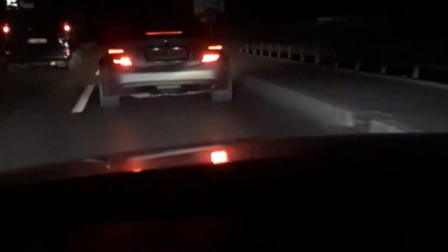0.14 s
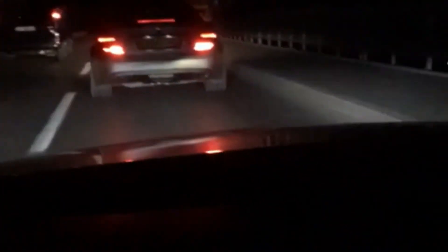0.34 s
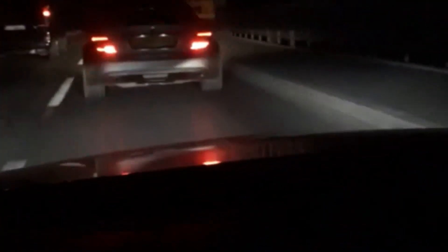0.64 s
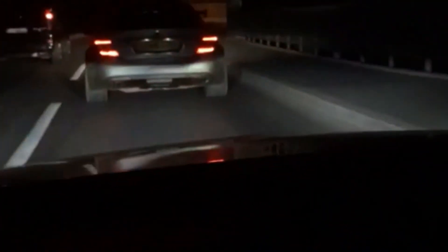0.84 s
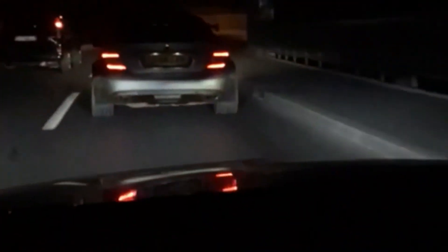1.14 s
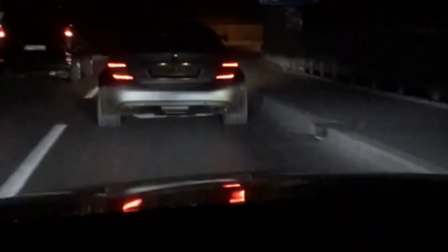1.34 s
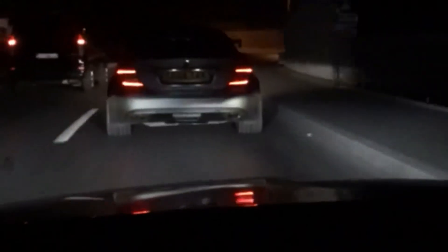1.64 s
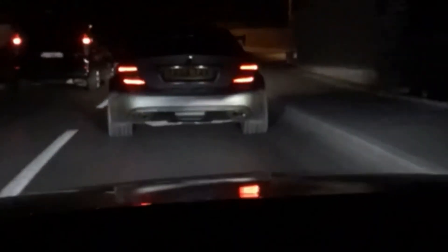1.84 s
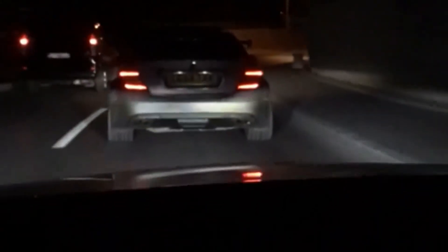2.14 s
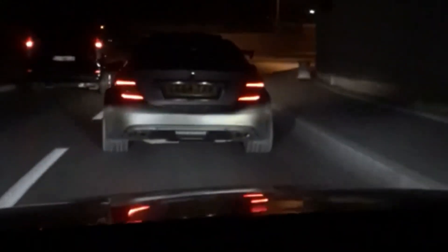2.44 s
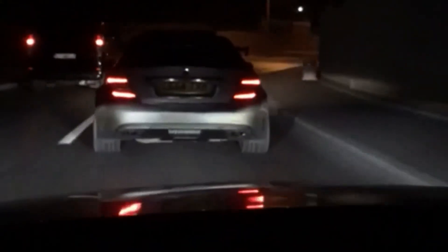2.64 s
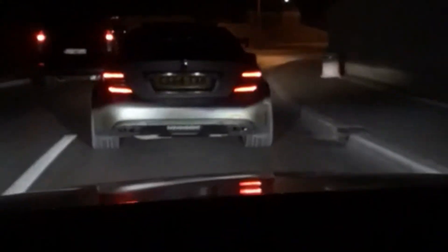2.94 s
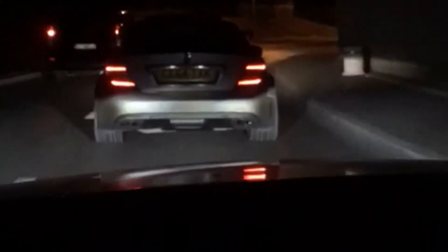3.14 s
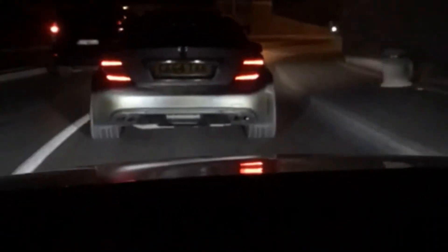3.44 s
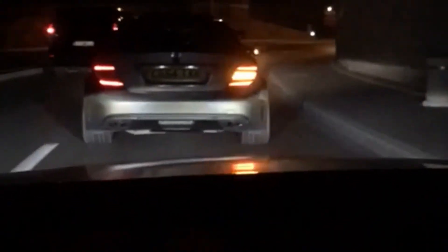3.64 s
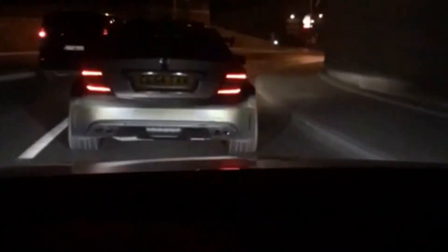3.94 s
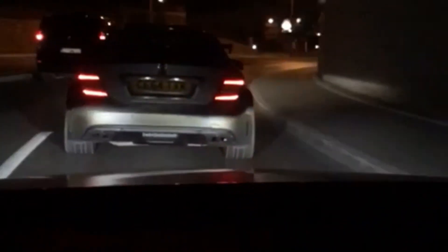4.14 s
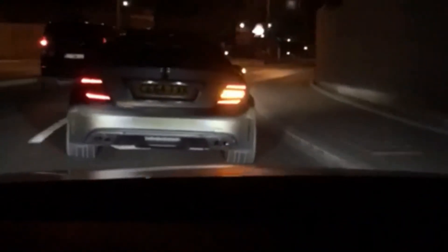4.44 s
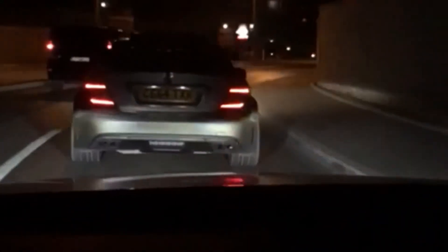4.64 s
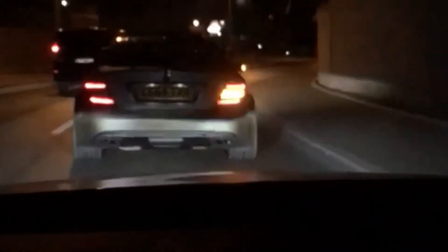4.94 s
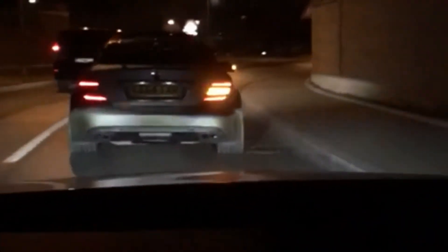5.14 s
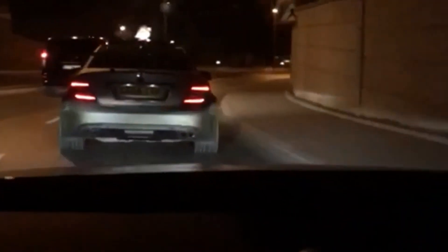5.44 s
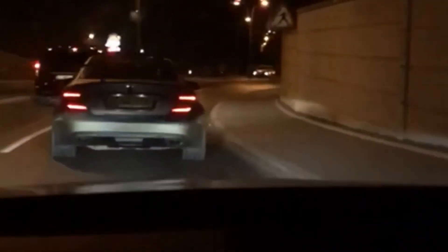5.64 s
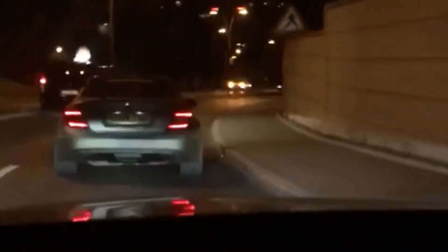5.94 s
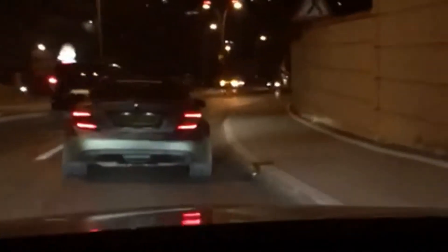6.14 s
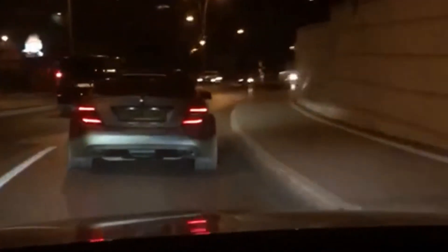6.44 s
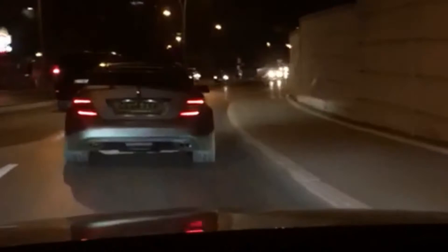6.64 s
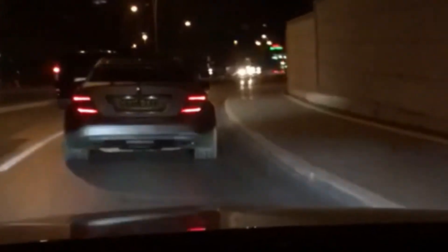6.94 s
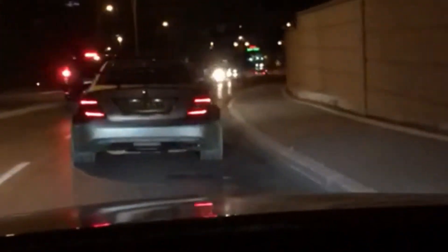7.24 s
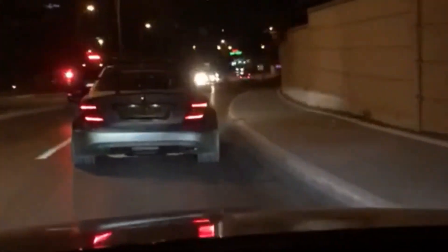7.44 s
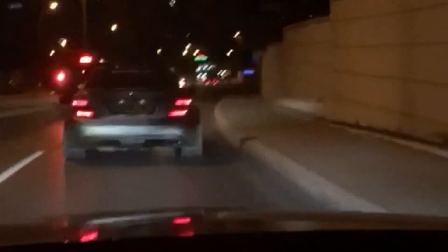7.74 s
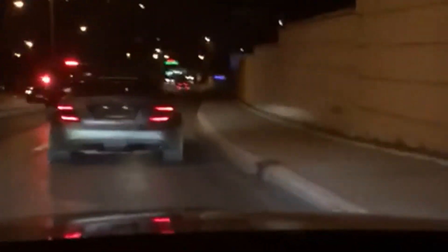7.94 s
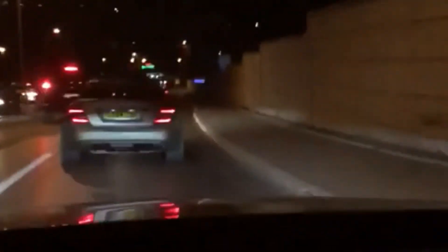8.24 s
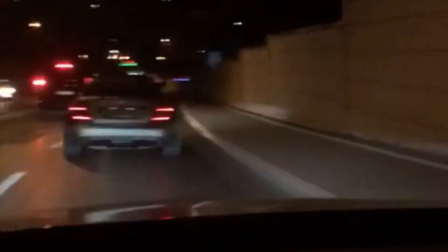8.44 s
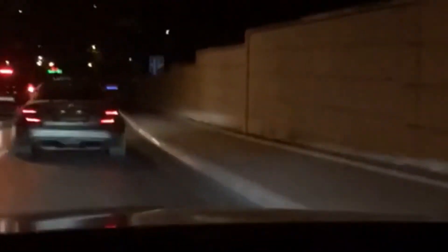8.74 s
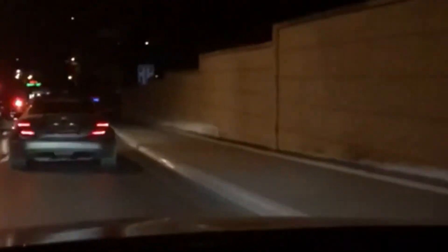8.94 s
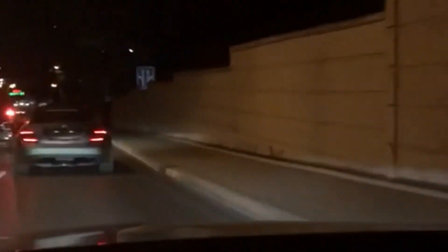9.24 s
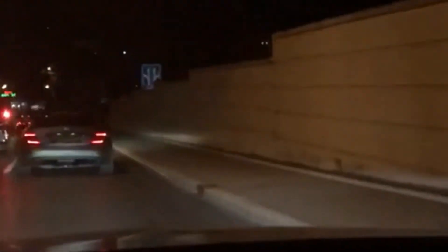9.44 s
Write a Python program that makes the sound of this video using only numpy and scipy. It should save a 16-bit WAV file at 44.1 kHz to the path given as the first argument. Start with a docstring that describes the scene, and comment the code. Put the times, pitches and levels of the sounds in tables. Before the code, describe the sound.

From a following car at night, a sports car's deep V8 drone sinks, then snarls in throttle bursts with hiss and exhaust pops over road rumble.

```python
"""A V8 sports car's exhaust, heard from the car behind, through an underpass and out along a wall.
It drones on the 4th and 5th multiples (orders) of the engine cycle, as sines that follow the speed.
Filtered noise burbles through uneven firing, and puffs of noise snarl and hiss on stabs of the throttle;
pops, thumps and whistles are short bursts.
Underneath lie noise beds for road rumble, tyres and rush, with ringing wheels and suspension clunks."""
import sys
import numpy as np
from scipy import signal
from scipy.fft import rfft, irfft
from scipy.io import wavfile

SR = 44100
rng = np.random.default_rng(int(sys.argv[2]) if len(sys.argv) > 2 else 0)


def store_pcm(level_fs):
    """Save levels as 16-bit WAV."""
    pcm = np.round(np.clip(level_fs, -1, 1) * 32767).astype(np.int16)
    wavfile.write(sys.argv[1], SR, np.atleast_2d(pcm).T)


N = 423360  # samples, 9.6 s
TIME = np.arange(N) / SR  # s
CONTROL_STEP = 40  # samples between points of a slow control curve

# Spectra of the noise beds and bursts: (frequency [Hz], relative density [dB per Hz])
RUMBLE_COLOUR = [(15, -29), (25, -3), (36, 0), (52, 2), (75, -5.5), (100, -16), (140, -4.5), (260, -23.5)]
TYRE_COLOUR = [(150, -3.5), (300, 3), (470, 0), (860, 1.5), (1100, 1.5), (1500, 0), (2200, -6), (3000, -11),
               (4800, -30.5), (5600, -22), (7500, -44), (10500, -42)]
RUSH_COLOUR = [(900, -6), (1600, 2), (2400, -0.5), (3300, 2.5), (4500, -3.5), (6300, -5.5), (8000, -7.5),
               (10500, -12.5)]
BURBLE_COLOUR = [(70, -23.5), (105, -2.5), (135, -4.5), (168, 2), (200, -1), (235, -10.5), (330, -37.5)]
GROWL_COLOUR = [(200, -23), (250, -6), (272, 0.5), (286, -13), (303, 5.5), (322, -6.5), (360, -9.5),
                (420, -17.5), (560, -36)]
RASP_COLOUR = [(300, -7), (380, 2.5), (470, -3.5), (540, 0.5), (620, 2.5), (850, -0.5), (1070, 4),
               (1300, -5), (1620, -9), (2200, -6.5), (3000, -19), (4500, -22), (9000, -57)]
JET_COLOUR = [(900, -13.5), (1400, 10.5), (1650, 2.5), (2200, -1.5), (3000, 1.5), (3850, 4.5), (4800, -2),
              (6000, -1.5), (7000, -4.5), (8000, -1), (10500, -11.5)]

# Rumble of the following car, lower where the road is smooth: (time [s], level [dB])
RUMBLE_BED = [(0, -21), (3.6, -27), (5.5, -28), (6.5, -27), (7.75, -35.5), (8.8, -36.5), (9.6, -20.5)]
# Dips in the road that shake its body: (start [s], length [s], level [dB])
JOLTS = [(.5, 0.11, -21), (1.04, 0.085, -30), (1.55, 0.1, -23), (6.24, 0.086, -19.5), (8.08, 0.21, -18)]
JOLT_ATTACK_S, JOLT_RELEASE_S = 0.071, 0.072
TYRE_DB = -33.5  # middle of the tyre roar's waver
# Rush of air and tyres along the wall: (time [s], level before the rush lift [dB])
RUSH = [(0, -46), (1.0, -48.5), (2.4, -49.5), (5.7, -44), (6.04, -39), (6.65, -33), (7.08, -42.5),
        (8.44, -47), (9.15, -43), (9.6, -41)]

# Soft high rustles as the road dips: (start [s], length [s], level around which it flickers [dB])
RUSTLES = [(7.85, .14, -50), (8.05, 0.08, -46.5)]
RUSTLE_ATTACK_S, RUSTLE_RELEASE_S = 0.07, 0.057

# Suspension clunks: (time [s], knock level [dB], thud level [dB], decay [s])
CLUNKS = [(3.455, -27, -32, 0.03), (3.515, -31, -30, 0.027), (3.675, -27.5, -31, 0.023),
          (6.295, -22, -22, 0.021)]
# What the suspension rings with: (frequency [Hz], width [Hz], level [dB])
CLUNK_MODES = [(790, 150, -4), (950, 110, 3), (1130, 200, -5)]

# Wheels knocking over a bump: (time [s], knock level [dB], rattle level [dB], decay [s])
# The knock level sets the body knock directly and, with the strike trim, the blow on the wheels.
BUMPS = [(.491, -19, -31, 0.014), (.4995, -18.5, -29.5, 0.013), (0.576, -16.5, -42, 0.010),
         (.823, -17.5, -52, 0.005)]
# Tyres singing, strongest on the first stretch of road: (time [s], level [dB])
SINGING = [(0, -34), (.3, -32), (.46, -24), (.56, -27.5), (.8, -31), (1.0, -31), (1.5, -48), (2.1, -55),
           (9.6, -37)]
# What the wheels ring with: (frequency [Hz], width [Hz], level [dB])
WHEEL_MODES = [(106, 23, 1.5), (697.6, 18, -4), (1138, 120, -3.5)]
# The dull body of a knock: (frequency [Hz], width [Hz], level [dB])
KNOCK_MODES = [(690, 280, -1.5), (1120, 350, -4.5)]
# Loose trim rattling: (frequency [Hz], width [Hz], level [dB])
RATTLE_MODES = [(3680, 830, -3.5), (6350, 1200, -14)]

# Exhaust pops: (time [s], crack level [dB], thud level [dB], decay [s])
POPS = [(5.166, -29, -30, 0.0069), (6.171, -20, -15, 0.0077), (6.184, -37, -19.5, 0.033),
        (6.239, -44, -23, 0.018), (6.262, -35, -25, 0.013), (7.329, -20.5, -40, 0.0093),
        (7.358, -28, -35, 0.0096), (7.412, -27, -37, 0.0082), (7.543, -31.5, -30, 0.042)]
# Late firings that thump in the silencers: (time [s], level [dB])
THUMPS = [(0.822, -13), (3.52, -10), (5.962, -6), (6.055, -9), (6.17, -8), (6.192, -10.5)]
THUMP_HZ, THUMP_RISE_S = 165.6, 0.0066

# Brief whistles in the jet at full throttle: (time [s], frequency [Hz], level [dB], decay [s])
WHISTLES = [(4.964, 3880, -26, 0.022), (5.055, 6770, -27.5, 0.03), (5.075, 3920, -31, 0.06),
            (5.166, 3800, -35, 0.13), (5.115, 6870, -29, 0.059), (5.193, 7100, -23, 0.022)]
WHISTLE_WIDTH_HZ = 110
# Gas jet at the tailpipes on full throttle: (start [s], held [s], level around which it sputters [dB])
JETS = [(4.915, 0.35, -23.5), (7.17, 0.19, -28.5)]
JET_ATTACK_S, JET_RELEASE_S, JET_IDLE_DB = 0.24, 0.13, -66
# Pipes snarling as the throttle snaps open: (start [s], held [s], level [dB])
SNARLS = [(4.93, 0.25, -26.5), (7.15, 0.044, -31)]
SNARL_ATTACK_S, SNARL_RELEASE_S = 0.072, 0.028
SNARL_HZ, SNARL_WIDTH_HZ = 1022, 330

# Spells of uneven firing: (start [s], length [s], low burble level [dB], growl level [dB])
BURBLES = [(0.0, 2.12, -27, -40.5), (0.48, 0.46, -30, -36.5), (2.4, 2.8, -40, -39.5),
           (3.43, 0.23, -26.5, -25.5), (3.7, 0.22, -28.5, -34), (4.9, 0.45, -26, -28.5),
           (5.93, 0.31, -21.5, -31.5), (6.27, 0.45, -27, -32.5), (8.1, 0.22, -37, -37),
           (9.27, 0.6, -22, -29.5)]
# Resting levels under the spells: low burble [dB], growl [dB]
EVEN_FIRING_DB = [-32.5, -40]
BURBLE_ATTACK_S, BURBLE_RELEASE_S = 0.037, 0.085

# Engine speed: (time [s], four-stroke cycle rate [cycles per s])
SPEED = [(0, 43.6), (0.2, 42.8), (0.42, 42.5), (0.62, 40.7), (1.0, 39.6), (1.2, 38.9), (1.52, 38.15),
         (1.62, 37.6), (1.85, 37.1), (2.1, 36.05), (2.28, 36.0), (2.42, 35.3), (2.8, 34.5), (3.15, 34.6),
         (3.35, 33.5), (3.6, 34), (3.9, 33.35), (4.35, 33.4), (4.52, 33), (4.76, 33.5), (4.9, 34.9),
         (5.0, 36.7), (5.1, 37.7), (5.25, 38.2), (5.38, 38.05), (5.52, 35.4), (5.82, 36.05), (6.1, 35.5),
         (6.38, 34.5), (6.58, 34.3), (6.72, 33.45), (7.02, 32.75), (7.13, 35.3), (7.23, 35.8), (7.3, 37.3),
         (7.44, 37.4), (7.52, 38.25), (7.72, 37.7), (7.83, 38.7), (7.95, 41), (8.16, 41.95), (8.29, 40.45),
         (8.44, 41.9), (8.6, 42.35), (8.78, 43.4), (8.92, 44.85), (9.22, 46.2), (9.35, 44.8), (9.6, 45.6)]
# Engine load: (time [s], load [0 coasting, 1 pulling, 2 pulling hard, 3 flat out])
LOAD = [(0, 0.19), (2.9, 0.07), (3.8, 1.7), (4.78, 1.2), (4.93, 3.2), (5.45, 2.4), (5.65, 3), (7.02, 0.62),
        (7.15, 1.3), (7.42, 2.3), (7.65, 1.6), (9.6, 0.84)]
# Strength of each of the eight exhaust pulses in a cycle, in firing order: level [dB]
FIRING_DB = [-11, -9, -5, -6.5, -4.5, -11.5, -5.5, -15.5]
# Presses of the throttle: (start [s], held [s], low boom drive [dB], order 5 boom drive [dB],
# exhaust note drive [dB], rasp level [dB])
PRESSES = [(0.0, 0.59, -41, -39, -28.5, -37), (0.68, 0.14, -11, -37, -28, -33),
           (0.92, .97, -19.5, -22, -22.5, -39), (1.82, 0.68, -19.5, -19.5, -27.5, -57),
           (2.55, 0.22, -15, -10, -24, -53), (2.8, 0.85, -20, -22, -52, -43),
           (3.7, 1.28, -19, -30.5, -49, -37.5), (4.84, 0.51, -16, -13.5, -12, -25),
           (5.33, 0.22, -32, -15, -26.5, -39), (5.75, 0.78, -18.5, -18, -26, -31),
           (6.45, 0.55, -15.5, -15, -30.5, -53), (7.10, 0.3, -14.5, -11, -14.5, -30),
           (7.39, 0.98, -19, -16, -22, -39), (8.24, 0.43, -20.5, -16.5, -21, -58),
           (8.6, 0.29, -16, -20, -23.5, -45), (8.84, 0.4, -18.5, -15.5, -24, -29)]
# The same four columns with the throttle shut [dB]
SHUT_DB = [-26, -26, -33, -35.5]
# The boom follows the pedal quickly, the note and the rasp more slowly
BOOM_ATTACK_S, BOOM_RELEASE_S = 0.1, 0.092
NOTE_ATTACK_S, NOTE_RELEASE_S = 0.15, 0.15

# Exhaust notes above the drone, levels relative to each other:
# (multiple of the cycle rate, coasting [dB], pulling [dB], pulling hard [dB], flat out [dB])
ORDERS_DB = [(6, -14, -8, -7, -13), (7, -23, -12, -12, -18), (8, -7, -7, -7, 0), (9, -15, -10, -11, -20),
             (10, -4, -15, -17, -16), (11, -17, -13, -14, -13), (12, -21, -15, -13, -14),
             (13, -16, -22, -26, -25), (14, -11, -9, -16, -8), (15, -14, -12, -19, -13),
             (16, -11, -15, -20, -23), (17, -18, -20, -27, -19), (18, -8, -19, -18, -22),
             (19, -12, -16, -18, -23), (20, -17, -11, -16, -16), (21, -14, -13, -22, -23),
             (22, -12, -15, -20, -17), (23, -14, -8, -17, -19), (24, -16, -12, -21, -17),
             (25, -18, -12, -18, -15), (26, -12, -13, -26, -13), (27, -14, -13, -12, -20),
             (28, -14, -9, -14, -14), (29, -11, -17, -16, -11), (30, -15, -25, -22, -14),
             (31, -13, -23, -20, -17), (32, -12, -22, -20, -30), (33, -18, -22, -25, -14),
             (36, -16, -26, -20, -23), (37, -22, -24, -33, -18), (38, -27, -34, -25, -20),
             (39, -28, -30, -23, -25), (43, -27, -28, -35, -24)]
# How deeply each note fades in and out: share coasting, pulling, pulling hard, flat out
SCATTER = [.38, .38, .52, .55]
# Standing waves in the exhaust pipes: (frequency [Hz], width [Hz], boost [dB])
PIPES = [(339, 22, 6), (540, 9, 5), (582, 30, 5), (699, 37, 7), (1150, 52, 2)]
# A narrow band rings between the walls at the end of the underpass:
# (start [s], length [s], level of the ring added to the note [dB])
WALL_RING = [(3.8, 0.87, 13)]
WALL_HZ, WALL_WIDTH_HZ = 818, 36
# What the silencers pass of the low orders: (frequency [Hz], gain [dB])
SILENCER = [(68, -25.5), (86, -18), (100, -19), (114, -13.5), (123, -10), (129, -13.5), (136, -8.5),
            (150, -5.5), (165, 1), (176, -0.5), (188, -1), (205, -6), (214, -6.5), (228, -20)]

CUTOFF_HZ = 10200  # top of the finished sound


def from_db(db):
    """Decibels to gain."""
    return 10 ** (np.asarray(db) / 20)


def rms_one(x):
    """Scale to unit rms."""
    return x / np.sqrt(np.mean(x ** 2) + 1e-20)


def in_time(rows):
    """Draw each column of a curve out to every sample."""
    times, *columns = np.transpose(rows)
    return [np.interp(TIME, times, column) for column in columns]


def drift(rate):
    """Smooth random movement of spread 1, changing about `rate` times a second."""
    pole = np.exp(-2 * np.pi * rate * CONTROL_STEP / SR)
    settling = 2000  # control points dropped while the filter fills
    raw = rng.standard_normal(N // CONTROL_STEP + 2 + settling)
    slow = signal.lfilter([1], [1, -2 * pole, pole * pole], raw)[settling:]
    return np.interp(np.arange(N) / CONTROL_STEP, np.arange(len(slow)), rms_one(slow))


def tinted(source, colour):
    """Give a flat source the spectrum `colour`, at unit rms."""
    hz, db = np.transpose(colour)
    log_bins = np.log(np.maximum(np.fft.rfftfreq(N, 1 / SR), 1))
    gain = from_db(np.interp(log_bins, np.log(hz), db, left=-np.inf, right=-np.inf))
    return rms_one(irfft(rfft(source) * gain, N))


def noise(colour):
    """Noise with the given spectrum, at unit rms."""
    return tinted(rng.standard_normal(N), colour)


def resonate(x, hz, width_hz):
    """Pass a sound through one resonance with a gain of about 1 at its peak."""
    pole = np.exp(-np.pi * width_hz / SR)
    feed = np.array([1, 0, -1]) * (1 - pole * pole) / 2
    return signal.lfilter(feed, [1, -2 * pole * np.cos(2 * np.pi * hz / SR), pole * pole], x)


def resonate_twice(x, hz, width_hz):
    """Apply one resonance twice for steep skirts, at unit rms."""
    return rms_one(resonate(resonate(x, hz, width_hz), hz, width_hz))


def ringing(modes):
    """Noise ringing steadily in a few resonances."""
    out = 0
    for hz, width, db in modes:
        # each pass is twice as wide, since two passes narrow the band
        out = out + from_db(db) * resonate_twice(rng.standard_normal(N), hz, 2 * width)
    return out


def bell(hz, centre_hz, width_hz):
    """Response of a resonance at `hz`, 1 at its centre."""
    return 1 / (1 + (2 * (hz - centre_hz) / width_hz) ** 2)


def swells(rows, rest_db, attack_s, release_s):
    """Gain for each level column: events rise, hold and die away, their power added to a resting level."""
    t = TIME[::CONTROL_STEP]
    power = from_db(rest_db).reshape(-1, 1) ** 2 + 0 * t
    for start, length, *levels_db in rows:
        rise = np.sin(np.pi / 2 * np.clip((t - start) / attack_s, 0, 1)) ** 2
        fall = np.exp(-np.maximum(t - start - length, 0) / release_s)
        power = power + np.outer(from_db(levels_db), rise * fall) ** 2
    return [np.interp(TIME, t, np.sqrt(p)) for p in power]


def struck(s, attack_s, decay_s):
    """Envelope of a blow: a quick rise at time s and an exponential decay."""
    age = np.maximum(TIME - s, 0)
    rise = 1 - np.exp(-np.minimum(age / attack_s, 20))
    return rise * np.exp(-np.minimum(age / decay_s, 20))


def blows(rows, attack_s):
    """Envelopes of the two parts of each blow."""
    out = 0
    for s, first_db, second_db, decay in rows:
        out = out + from_db([[first_db], [second_db]]) * struck(s, attack_s, decay)
    return out


def road(rush_db, waver_db):
    """Rumble of the following car with its jolts, wavering tyre roar, and a brighter rush that swells and sinks."""
    jolts, = swells(JOLTS, -np.inf, JOLT_ATTACK_S, JOLT_RELEASE_S)
    bed_db, = in_time(RUMBLE_BED)
    rumble = np.hypot(from_db(bed_db), jolts) * noise(RUMBLE_COLOUR)
    tyres = from_db(TYRE_DB + waver_db * drift(12)) * noise(TYRE_COLOUR)
    wall_db, = in_time(RUSH)
    rush = from_db(wall_db + rush_db + waver_db * drift(12)) * noise(RUSH_COLOUR)
    return rumble + tyres + rush


def rustle(flicker_db):
    """Soft, flickering puffs of treble: noise in one high band under a random level."""
    level, = swells(RUSTLES, -np.inf, RUSTLE_ATTACK_S, RUSTLE_RELEASE_S)
    return level * from_db(flicker_db * drift(60)) * ringing([(5600, 850, 0)])


def clunks():
    """The suspension takes a seam in the road: a rattly knock over a dull thud."""
    knock, thud = blows(CLUNKS, attack_s=0.011)
    return knock * ringing(CLUNK_MODES) + thud * noise(GROWL_COLOUR)


def wheels(strike_db, contact_hz):
    """Coarse road rings the wheels; a bump strikes the same modes, knocks the body and sets off a rattle."""
    shudder, rattle = blows(BUMPS, attack_s=0.0016)
    clicks = np.zeros(N)
    for s, knock_db, _, _ in BUMPS:
        clicks[round(s * SR)] = from_db(knock_db + strike_db)
    # rubber makes the contact soft
    soft_contact = signal.butter(2, contact_hz, fs=SR, output="sos")
    push = signal.sosfilt(soft_contact, clicks + 1e-18)
    knocks = 0
    for hz, width, db in WHEEL_MODES:
        # a narrow mode passes little of a click, so lift it by its sharpness
        knocks = knocks + from_db(db) * resonate(push, hz, width) * SR / (2 * np.pi * width)
    singing_db, = in_time(SINGING)
    singing = from_db(singing_db) * ringing(WHEEL_MODES)
    return knocks + singing + shudder * ringing(KNOCK_MODES) + rattle * ringing(RATTLE_MODES)


def thumps():
    """A late firing swells and rings in the silencers for a few cycles of one low tone."""
    out = np.zeros(N)
    for s, db in THUMPS:
        age = np.clip(TIME - s, 0, 1)
        envelope = age / THUMP_RISE_S * np.exp(1 - age / THUMP_RISE_S)
        out += from_db(db) * envelope * np.sin(2 * np.pi * THUMP_HZ * age)
    return out


def pops():
    """Unburnt fuel goes off in the pipes: a crack and a thud that die away between the walls."""
    crack, thud = blows(POPS, attack_s=0.0018)
    return crack * noise(JET_COLOUR) + thud * noise(RASP_COLOUR)


def whistles(attack_s):
    """The jet catches an edge and whistles for a moment in a narrow band."""
    out = 0
    for s, hz, db, decay in WHISTLES:
        out = out + struck(s, attack_s, decay) * ringing([(hz, WHISTLE_WIDTH_HZ, db)])
    return out


def jet(gas, flow, sputter_db):
    """Under full throttle the gas hisses out of the tailpipes, puff by puff."""
    return flow * from_db(sputter_db * drift(40)) * tinted(gas, JET_COLOUR)


def snarl(gas):
    """The first hard puffs of a throttle stab excite a broad pipe resonance."""
    level, = swells(SNARLS, -np.inf, SNARL_ATTACK_S, SNARL_RELEASE_S)
    return level * resonate_twice(gas, SNARL_HZ, SNARL_WIDTH_HZ)


def rough_firing(gas, rasp):
    """Uneven combustion stirs the low pipe resonances; each puff tears into a rasp."""
    burble, growl = swells(BURBLES, EVEN_FIRING_DB, BURBLE_ATTACK_S, BURBLE_RELEASE_S)
    return burble * noise(BURBLE_COLOUR) + growl * noise(GROWL_COLOUR) + rasp * tinted(gas, RASP_COLOUR)


def crank(wobble):
    """Cycle rate and cycles turned; the speed is never quite steady."""
    speed, = in_time(SPEED)
    rate = speed * (1 + wobble * drift(9.5))
    return rate, np.cumsum(rate) / SR


def puffs(cycles, depth, throb, repeat):
    """Eight unequal puffs of turbulent gas a cycle; part of their ragged shape comes back every cycle."""
    firing = cycles * len(FIRING_DB)
    strength = from_db(FIRING_DB)[firing.astype(int) % len(FIRING_DB)]
    depth, throb, repeat = np.clip([depth, throb, repeat], 0, 1)
    pulses = 1 - depth + depth * 2 * strength * np.sin(np.pi * firing) ** 2
    gate = pulses * (1 + throb * np.cos(2 * np.pi * cycles))
    shape = rng.standard_normal(size=1200)  # points over one cycle
    recurring = rms_one(np.interp(cycles % 1, np.linspace(0, 1, len(shape)), shape))
    fresh = rng.standard_normal(N)
    return gate * (np.sqrt(repeat) * recurring + np.sqrt(1 - repeat) * fresh)


def exhaust_note(rate, cycles, fade_rate):
    """Upper orders follow the load and swell across pipe and wall resonances; reflections fade each its own way."""
    speeds = np.linspace(rate.min(), rate.max(), 400)
    load, = in_time(LOAD)
    steps = np.arange(len(SCATTER))
    scatter = np.interp(load, steps, SCATTER)
    walls, = swells(WALL_RING, -np.inf, NOTE_ATTACK_S, NOTE_RELEASE_S)
    out = 0
    for order, *levels_db in ORDERS_DB:
        order = round(order)
        pipe_db = sum(db * bell(order * speeds, hz, width) for hz, width, db in PIPES)
        gain = from_db(np.interp(load, steps, levels_db) + np.interp(rate, speeds, pipe_db))
        gain = gain * (1 + walls * bell(order * rate, WALL_HZ, WALL_WIDTH_HZ))
        angle = 2 * np.pi * (order * cycles + rng.random())
        # the steady tone plus reflections that wander in strength and phase
        in_phase = (1 + scatter * drift(fade_rate)) * np.sin(angle)
        sideways = scatter * drift(fade_rate) * np.cos(angle)
        out = out + gain * (in_phase + sideways)
    return out / np.sqrt(1 + 2 * scatter ** 2)


def drone(rate, cycles, flutter_db, coasting_db):
    """Orders 2 to 5 boom as speed carries them through the silencers' resonance; 2 and 3 sink when coasting."""
    low, fifth, _, _ = swells(PRESSES, SHUT_DB, BOOM_ATTACK_S, BOOM_RELEASE_S)
    load, = in_time(LOAD)
    deep = low * from_db(coasting_db * np.maximum(1 - load, 0))
    hz, db = np.transpose(SILENCER)
    out = 0
    for order, drive in enumerate([deep, deep, low, fifth], 2):
        gain = drive * from_db(np.interp(order * rate, hz, db) + flutter_db * drift(12.8))
        out = out + np.sqrt(2) * gain * np.sin(2 * np.pi * (order * cycles + rng.random()))
    return out


def scene():
    """Mix the exhaust over the road noise."""
    rolling = wheels(strike_db=-2.5, contact_hz=1200) + clunks()
    rolling = rolling + road(rush_db=2.0, waver_db=1.0) + rustle(flicker_db=6.0)

    rate, cycles = crank(wobble=0.00041)
    gas = puffs(cycles, depth=0.36, throb=0.21, repeat=0.4)
    rasping_gas = puffs(cycles, depth=0.37, throb=0.22, repeat=0.072)
    _, _, note, rasp = swells(PRESSES, SHUT_DB, NOTE_ATTACK_S, NOTE_RELEASE_S)
    flow, = swells(JETS, JET_IDLE_DB, JET_ATTACK_S, JET_RELEASE_S)
    bursts = snarl(gas) + jet(gas, flow, sputter_db=1.5) + whistles(attack_s=0.004) + pops() + thumps()

    # at full throttle single firings come early or late, strong or weak, which frays the high orders most
    strain = np.sqrt(flow / flow.max())
    ragged_cycles = cycles + 0.0019 * strain * drift(28)
    shaken_note = note * from_db(-5.0 + 1.3 * strain * drift(35))
    tones = drone(rate, cycles, flutter_db=1.63, coasting_db=-5.0)
    tones = tones + shaken_note * exhaust_note(rate, ragged_cycles, fade_rate=3.4)
    return (tones + rough_firing(rasping_gas, rasp) + bursts + rolling)[None]


def record(dry):
    """Round off the highest peaks and cut the top steeply."""
    rounded = dry / (1 + (dry / 0.95) ** 8) ** (1 / 8)
    top_cut = signal.ellip(10, 0.2, 90, CUTOFF_HZ, fs=SR, output="sos")
    return signal.sosfilt(top_cut, rounded)


dry = scene()
out = record(dry)
store_pcm(out)
```